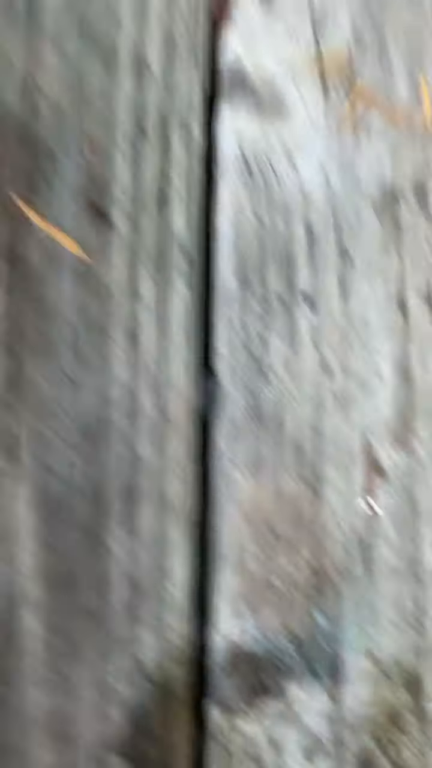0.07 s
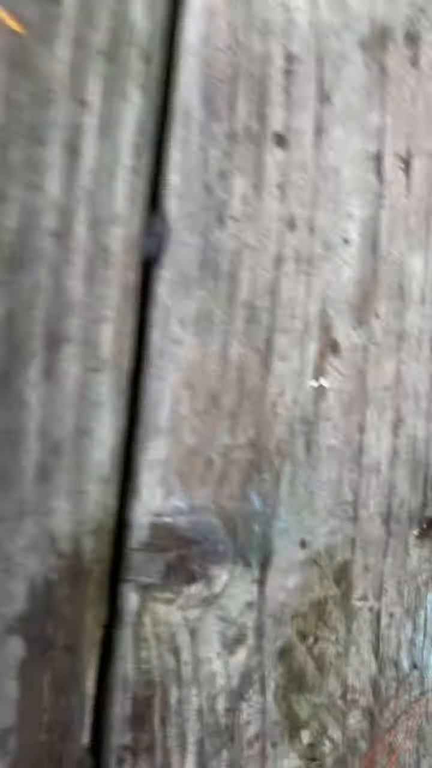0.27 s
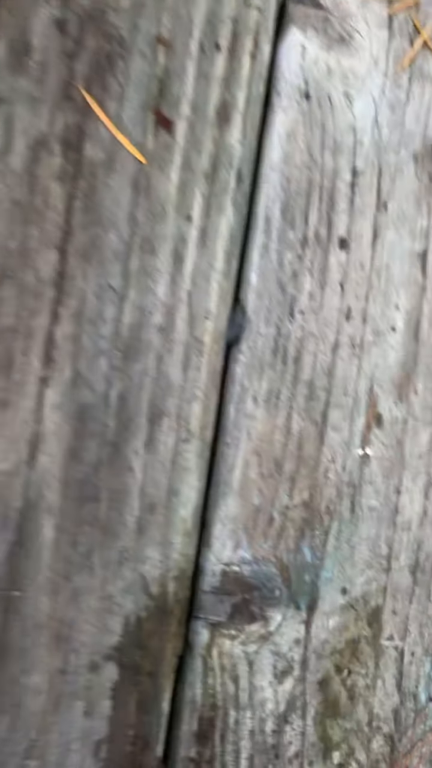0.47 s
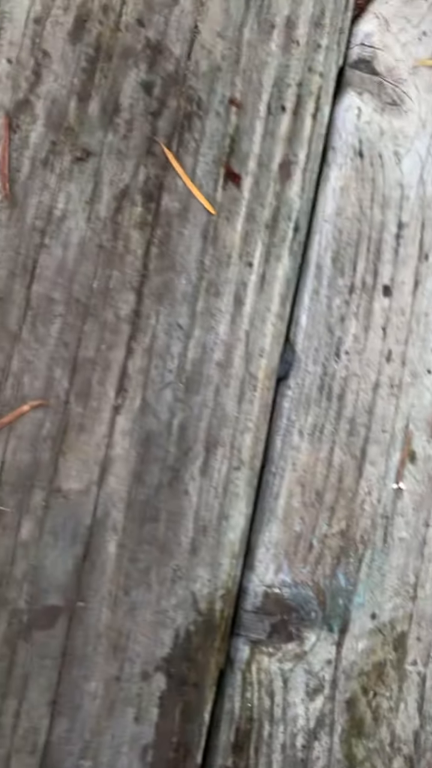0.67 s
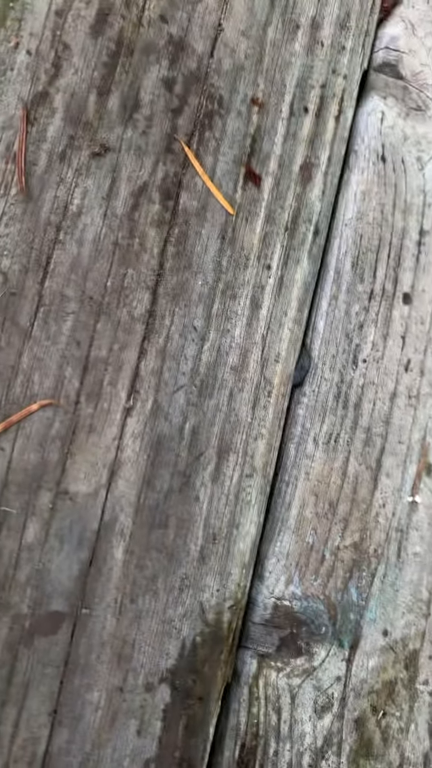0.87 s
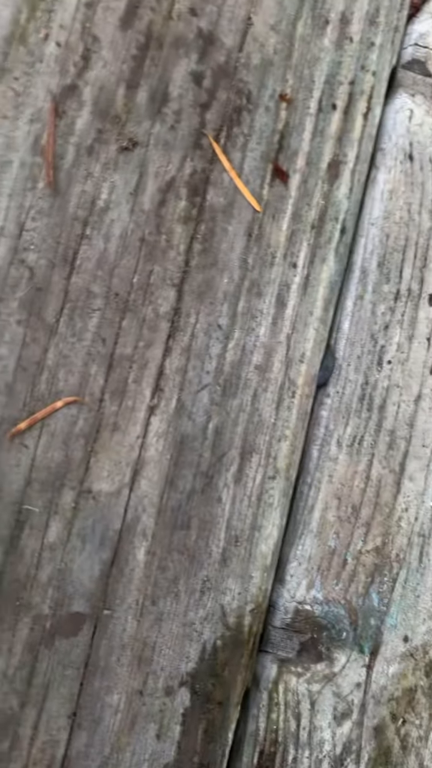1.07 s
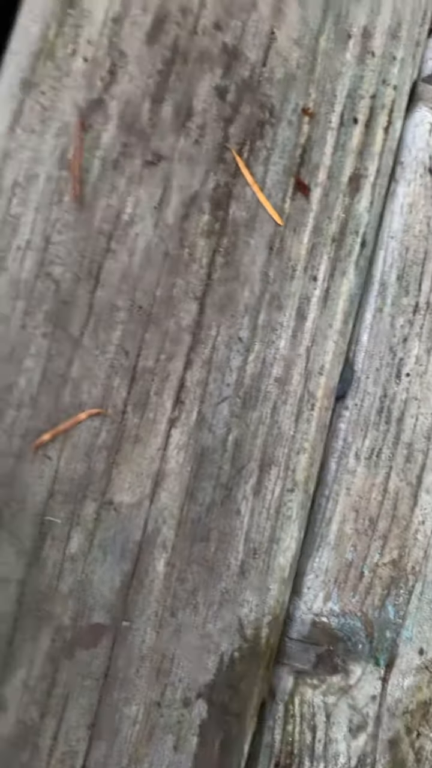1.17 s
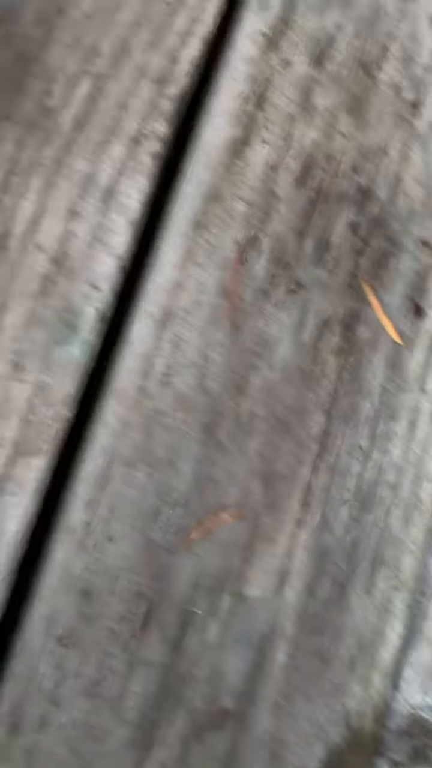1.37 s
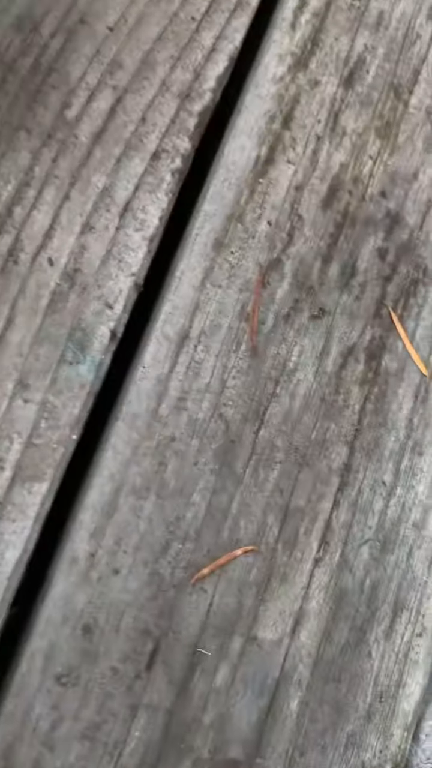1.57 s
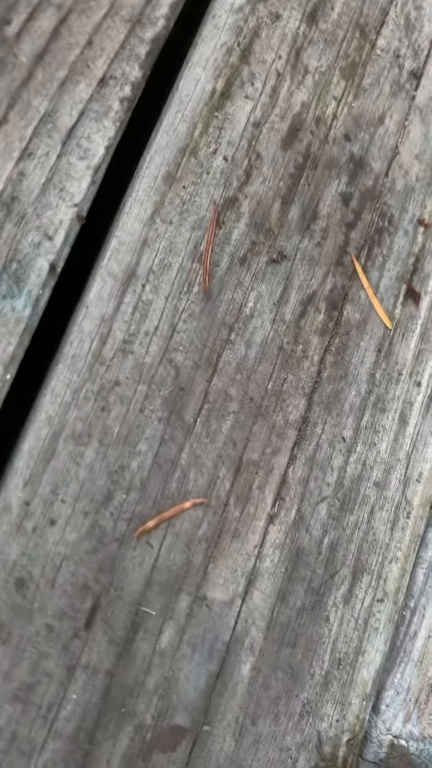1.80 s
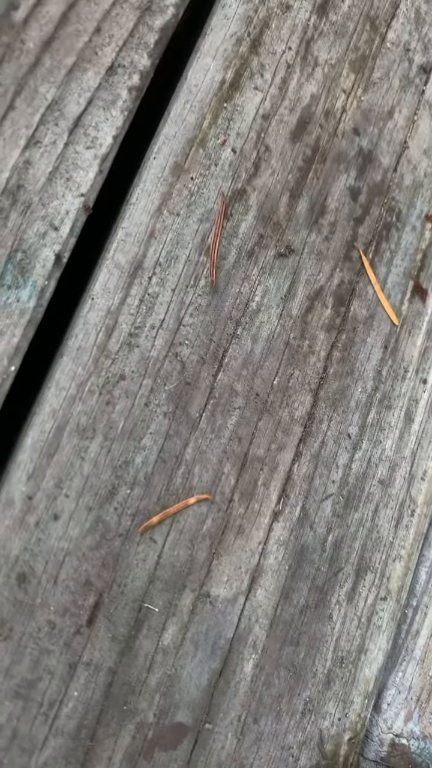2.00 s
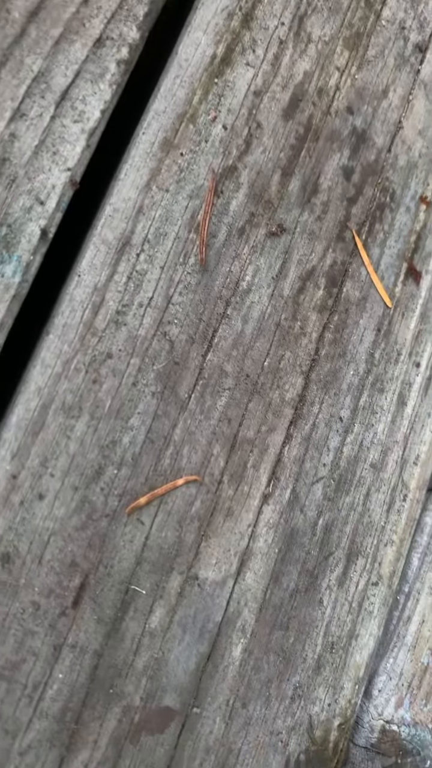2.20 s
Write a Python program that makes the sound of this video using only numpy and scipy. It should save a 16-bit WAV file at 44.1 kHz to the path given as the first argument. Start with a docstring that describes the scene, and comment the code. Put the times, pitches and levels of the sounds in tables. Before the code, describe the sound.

Five short, high, slightly hoarse squeaks come from a chipmunk by a wooden deck among trees. A dull footstep and rustle open the scene and return midway, close to the microphone, while a low rumble runs underneath.

```python
"""A wooden deck among trees, with a chipmunk underneath. Over a low rumble of wind and far traffic,
cloth or leaves rustle in tiny grains of friction, three dull steps ring through the planks as bending
waves, and small dry ticks snap. The chipmunk squeaks five times: an arched whistle from its vocal folds
that turns hoarse and trails off in a falling whine. The trees send back a thin echo, and a faint far
twitter slips in between the squeaks."""
import sys
import numpy as np
from scipy import signal
from scipy.fft import rfft, irfft
from scipy.io import wavfile
from scipy.ndimage import uniform_filter1d

SR = 44100
rng = np.random.default_rng(int(sys.argv[2]) if len(sys.argv) > 2 else 0)


def generate_wav(signal):
    """Clip the signal to [-1, 1] and save it as 16-bit WAV at the path in sys.argv[1]."""
    frames = np.transpose(np.atleast_2d(signal))
    scaled = np.clip(frames, -1, 1) * 32767
    pcm = np.round(scaled).astype(np.int16)
    wavfile.write(sys.argv[1], SR, pcm)


N = 98960


def amp(db):
    return 10 ** (np.asarray(db) / 20)


def unit_rms(x):
    return x / np.sqrt(np.mean(x ** 2) + 1e-20)


def drift(rate_hz):
    """Smooth random modulator, rms 1."""
    pole = np.exp(-2 * np.pi * rate_hz / SR)
    return unit_rms(signal.lfilter([1], [1, -2 * pole, pole * pole], rng.standard_normal(N + SR))[SR:])


def equalise(x, curve):
    """Shape a sound with an EQ curve; rms 1."""
    hz, db = np.transpose(curve)
    bins_hz = np.maximum(np.arange(N // 2 + 1) * SR / N, 1)
    gain = amp(np.interp(np.log(bins_hz), np.log(hz), db, left=-90, right=-90))
    return unit_rms(irfft(rfft(x) * gain, N))


# Bass-heavy EQ of the background bed: f/Hz, relative level/dB
RUMBLE_EQ = [(12, -1), (20, -19.5), (54, 2), (112, 0), (133, -8), (171, -14.5), (238, -14.5), (439, -22.5),
             (631, -25.5), (1160, -32), (1820, -44), (4070, -49), (5530, -50.5), (6190, -51.5), (7310, -48),
             (12400, -60), (15500, -77)]


def rumble(level_db=-45.5):
    """Wind and far traffic: a nearly steady bed of low noise."""
    return amp(level_db + 0.14 * drift(13)) * equalise(rng.standard_normal(N), RUMBLE_EQ)


# Papery EQ of the rustle: f/Hz, relative level/dB
RUSTLE_EQ = [(710, -5), (1200, -8.5), (1540, -10), (1600, -5.5), (1890, -3.5), (2310, -6.5), (3030, -9.5),
             (3480, -6.5), (4650, -7), (5300, -3), (6160, -10), (7160, -2.5), (11100, -19), (15700, -27)]
# Fader ride of the rustle: t/s, level/dB
RUSTLE_FADER = [(0, -53), (.07, -54), (.16, -58.5), (.2, -62.5), (.35, -64.5), (.47, -63.5), (.58, -69),
                (.66, -75), (.85, -81), (1.02, -75), (1.13, -87), (1.18, -71.5), (1.25, -67.5), (1.29, -64),
                (1.35, -66.5), (1.47, -77), (1.71, -71.5), (1.88, -100), (2.24, -98)]


def rustle(grains_per_s=5000, spread_db=1.5):
    """Cloth or leaves rubbing: dense, tiny grains of friction."""
    times, db = np.transpose(RUSTLE_FADER)
    hits = rng.random(N) < grains_per_s / SR
    strength = amp(-spread_db * np.minimum(rng.exponential(1, N), 5))
    grains = hits * strength * rng.choice([-1, 1], N)
    fader = amp(np.interp(np.arange(N) / SR, times, db) + 0.54 * drift(17))
    return fader * equalise(grains, RUSTLE_EQ)


# Footfalls on the deck: t/s, envelope peak/dB
FOOTFALLS = [(-.0005, -28.5), (0.0262, -31), (1.2801, -28.5)]


def steps(rise_s=0.0045, fall_s=0.012):
    """Bending waves in the planks: the highs arrive first, so the pitch falls as one over time."""
    out = 0
    for start, db in FOOTFALLS:
        t = np.maximum(np.arange(N) / SR - start, 1e-5)
        envelope = np.exp(-(rise_s / t) ** 2 - t / fall_s)
        turns = 1.58 * np.log(t / 0.01006) + 0.32
        out = out + amp(db) * envelope / envelope.max() * np.cos(2 * np.pi * turns)
    return out


# Small dry snaps: t/s, peak/dB, low edge/Hz, high edge/Hz
SNAPS = [(.0035, -42, 513, 1490), (.0292, -48.5, 510, 1170), (0.577, -53.5, 1510, 10500),
         (.8635, -58.5, 7600, 10900), (.887, -69, 8500, 10500), (.947, -72, 7400, 8800),
         (.961, -66, 7500, 9700), (1.07, -63, 4740, 6100), (1.167, -65, 4000, 10000),
         (1.1734, -51, 4200, 8200), (1.179, -58, 6800, 8200), (1.190, -45.5, 4000, 9000),
         (1.2255, -57, 6500, 11000), (1.242, -62, 7000, 8500), (1.2823, -43.5, 720, 2660),
         (1.342, -51, 2520, 6050), (1.377, -50, 2500, 7500), (2.0655, -50.5, 1700, 11000)]


def ticks(fuzz_t60_s=0.018, dull_hz=4130):
    """Each snap is a click with a short fuzzy tail, in a band of its own."""
    out, t = np.zeros(N + SR), np.arange(SR // 20) / SR
    for start, db, low_hz, high_hz in SNAPS:
        fuzz = 0.13 * rng.standard_normal(len(t)) * amp(-60 * t / fuzz_t60_s)
        band = signal.butter(4, [low_hz, high_hz], "band", fs=SR, output="sos")
        snap = signal.sosfilt(band, (t == 0) + fuzz)
        snap = signal.lfilter(*signal.butter(1, dull_hz, fs=SR), snap)
        at = int(start * SR)
        out[at:at + len(t)] += amp(db) * snap / np.abs(snap).max()
    return out[:N]


# Pitch and level contours, one list per squeak: t/s, f/Hz, overtones/dB, fundamental/dB
SQUEAK_CONTOURS = [
    [(.259, 2050, -85, -81), (.265, 2190, -59, -72), (.272, 2208, -58.5, -69), (.288, 2192, -59, -68),
     (.295, 2140, -76, -71), (.304, 1620, -100, -60), (.325, 1370, -110, -87)],
    [(.449, 2060, -85, -85), (.455, 2194, -62, -70), (.468, 2200, -68, -65), (.476, 2175, -67, -63.5),
     (.486, 2094, -77, -77), (.505, 1767, -105, -63), (.545, 1327, -110, -73), (.56, 1150, -110, -70)],
    [(.705, 2030, -97, -92), (.712, 2156, -71, -79), (.719, 2165, -66.5, -69), (.729, 2160, -69, -65.5),
     (.739, 2125, -69, -77), (.752, 2010, -96, -71), (.765, 1800, -110, -94)],
    [(1.264, 2080, -85, -95), (1.269, 2130, -60, -76), (1.275, 2255, -56.5, -66), (1.284, 2259, -60, -68),
     (1.294, 2384, -57.5, -55.5), (1.303, 2390, -55, -64), (1.312, 2354, -59.5, -63.5),
     (1.326, 2166, -60, -64), (1.345, 2086, -91, -75), (1.37, 1817, -110, -78), (1.39, 1542, -110, -68.5),
     (1.42, 942, -110, -78), (1.445, 700, -110, -60.5), (1.47, 607, -110, -58.5), (1.49, 557, -110, -83)],
    [(1.893, 1990, -83, -89), (1.897, 2070, -53, -78), (1.902, 2290, -48, -71), (1.916, 2320, -47, -62),
     (1.932, 2335, -47.5, -57), (1.942, 2290, -50, -63), (1.951, 2220, -52.5, -70), (1.966, 2006, -63, -72),
     (1.98, 1949, -102, -75), (2.01, 1611, -110, -69), (2.035, 1143, -110, -70), (2.07, 916, -110, -67),
     (2.1, 709, -110, -75), (2.13, 624, -110, -57.5), (2.155, 590, -110, -74)],
]
# Timbre per squeak: harmonics 3 to 6 against the 2nd/dB, breath/dB, in-between lines/dB, echo send/dB
SQUEAK_TIMBRES = [(-26, -19, -30, -26, -25, -35, -9), (-12, -5, -21, -30, -19, -17, -9.5),
                  (-6.5, -14, -29, -30, -8, -13, -4), (-2.5, -3, -21, -32, -10, -33, -5.5),
                  (-15, -25, -50, -42, -16.5, -28, -10.5)]
# How often the vocal folds repeat their pattern, per squeak: period/cycles
FOLD_PERIODS = [2, 2, 3, 2, 2]
# Airy EQ of the breath and the in-between lines: f/Hz, relative level/dB
BREATH_EQ = [(2500, -19), (3600, -5), (6000, -15), (7800, -2.5), (9300, -4.5), (10600, -6.5), (11800, -31),
             (15500, -23)]


def squeaks(hoarse_sag_hz=550, hoarse_fade_db=12):
    """Chipmunk voice: harmonics, rough lines between them, and breath. Returns dry and echo send."""
    dry, send = 0, 0
    wobble, rough = drift(110), drift(270)
    air = equalise(rng.standard_normal(N), BREATH_EQ)
    rasp = drift(160)
    eq_hz, eq_db = np.transpose(BREATH_EQ)
    for contour, timbre, cycles in zip(SQUEAK_CONTOURS, SQUEAK_TIMBRES, FOLD_PERIODS):
        times, hz, overtones_db, fundamental_db = np.transpose(contour)
        *harmonics_db, breath_db, between_db, send_db = timbre
        span = slice(int(times[0] * SR), int(times[-1] * SR))
        t = np.arange(N)[span] / SR
        pitch = uniform_filter1d(np.interp(t, times, hz), size=SR // 300, mode="nearest")
        phase = 2 * np.pi * np.cumsum(pitch * (1 + 0.005 * wobble[span])) / SR
        # As the pitch sags past its peak, breath and top harmonics thin out.
        hoarse = np.clip((hz.max() - pitch) / hoarse_sag_hz, 0, 1) * (t > times[hz.argmax()])
        fade_db = hoarse_fade_db * hoarse
        overtones = amp(breath_db - fade_db) * air[span]
        for k, db in enumerate([0, *harmonics_db]):
            overtones += amp(db - k * fade_db) * np.sin((k + 2) * phase)
        # The folds' repeating pattern puts fluttering lines between the harmonics.
        for k in range(cycles + 1, 5 * cycles):
            if k % cycles:
                line_db = np.interp(np.log(k / cycles * hz.max()), np.log(eq_hz), eq_db)
                flutter_db = 5 * np.roll(rough, 997 * k)[span]
                overtones += amp(between_db + line_db + flutter_db) * np.sin(k / cycles * phase)
        overtones *= amp(np.interp(t, times, overtones_db))
        fundamental = amp(np.interp(t, times, fundamental_db)) * np.sin(phase)
        # The sagging tone breaks into a narrow rasp, then clears below 800 Hz.
        breakup = 1 - hoarse + hoarse * np.where(pitch > 800, rasp[span], 1)
        voice = np.zeros(N)
        voice[span] = np.sqrt(2) * amp(rough[span]) * breakup * (overtones + fundamental)
        dry, send = dry + voice, send + amp(send_db) * voice
    return dry, send


# Slaps off single large surfaces: delay/s, level against the scatter/dB
SLAPS = [(.02, -12), (.042, -9), (.078, -12), (.112, -10), (.255, -20)]


def echo(send, t60_s=0.56, lumps_db=1.5, dull_hz=2800):
    """Scatter from trunks and boards: a dark, lumpy, dying tail with a few distinct slaps."""
    t = np.arange(SR) / SR
    scatter = rng.standard_normal(SR)
    decay = amp(lumps_db * drift(40)[:SR] - 60 * t / t60_s)
    bloom = 1 - np.exp(-t / 0.012)
    tail = unit_rms(scatter * decay * bloom) / np.sqrt(SR)
    for delay, db in SLAPS:
        tail[int(delay * SR)] += amp(db)
    tail = signal.lfilter(*signal.butter(1, dull_hz, fs=SR), tail)
    return signal.fftconvolve(send, tail)[:N]


# Faint far peeps: t/s, length/s, start f/Hz, end f/Hz, level/dB
PEEPS = [(.904, .045, 7150, 6700, -81), (.972, .05, 6700, 6550, -83), (1.136, .025, 5200, 5100, -77)]


def twitter(rough_db=5, wobble_depth=0.025):
    """Short, high tones that glide down, roughened in level and pitch."""
    out, t = 0, np.arange(N) / SR
    rough = amp(rough_db * drift(120))
    wobble = 1 + wobble_depth * drift(200)
    for start, length, start_hz, end_hz, db in PEEPS:
        progress = np.clip((t - start) / length, 0, 1)
        pitch = (start_hz + (end_hz - start_hz) * progress) * wobble
        envelope = np.sqrt(2 * np.sin(np.pi * progress ** 0.6).clip(0))
        out = out + amp(db) * envelope * rough * np.sin(2 * np.pi * np.cumsum(pitch) / SR)
    return out


def scene():
    """All layers meet in one mono mix."""
    voice, send = squeaks()
    return (rumble() + voice + echo(send) + steps() + ticks() + rustle() + twitter())[None]


def record(dry, cutoff_hz=15900):
    """A steep low-pass trims the very top."""
    return signal.sosfilt(signal.cheby2(24, 60, cutoff_hz, fs=SR, output="sos"), dry)


dry = scene()
out = record(dry)
generate_wav(out)
```